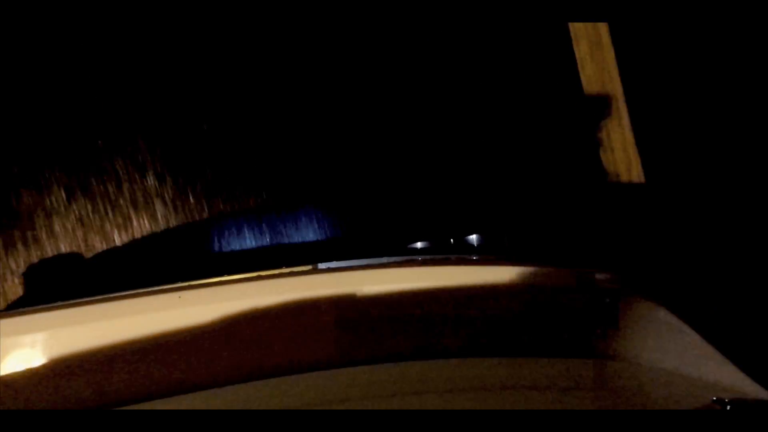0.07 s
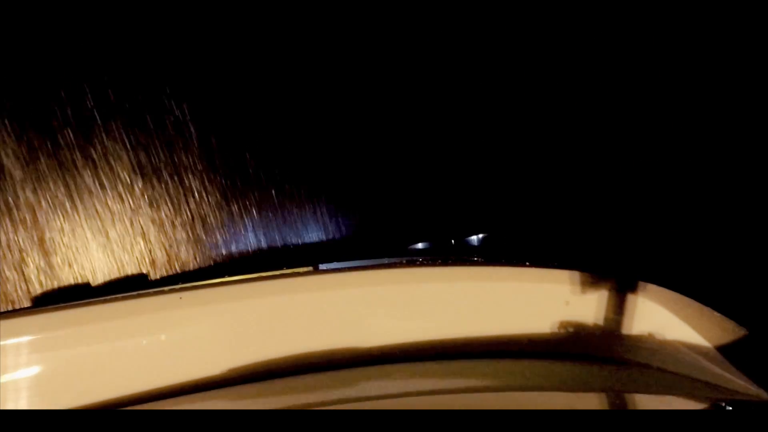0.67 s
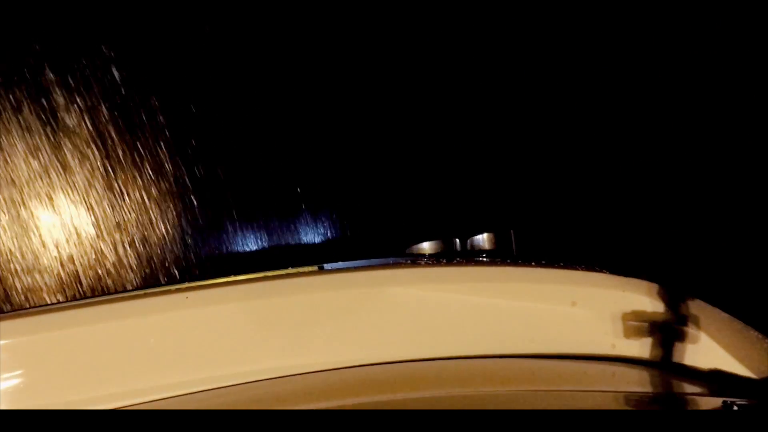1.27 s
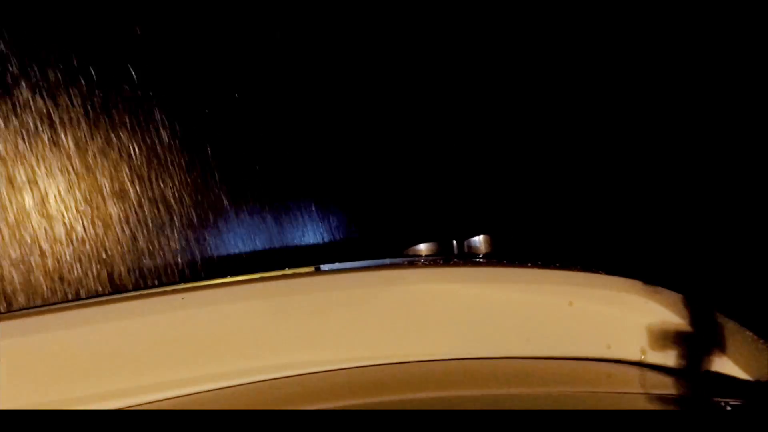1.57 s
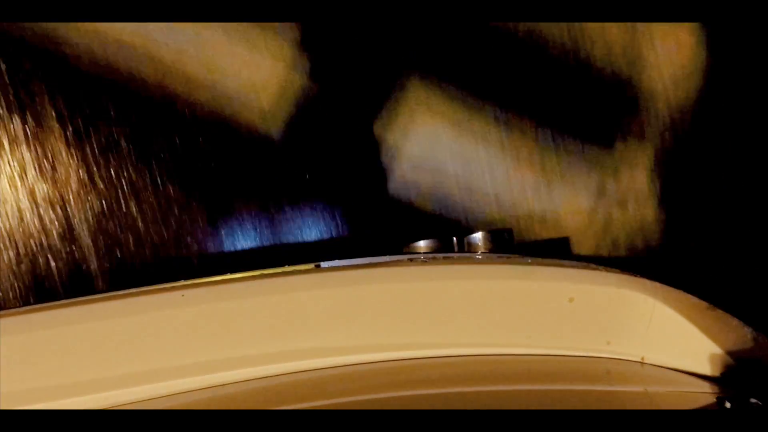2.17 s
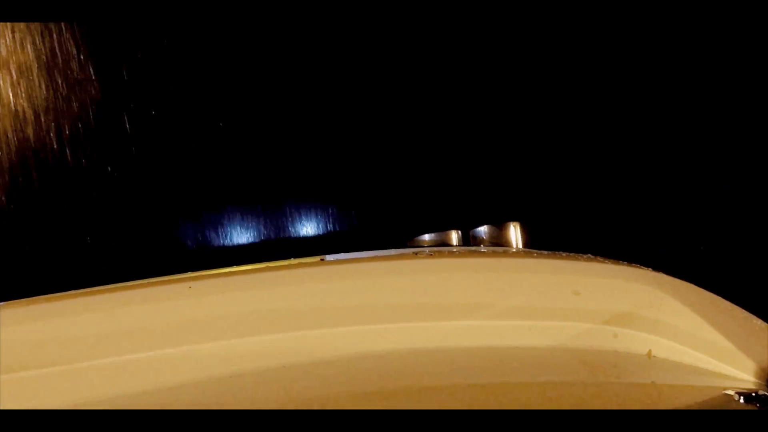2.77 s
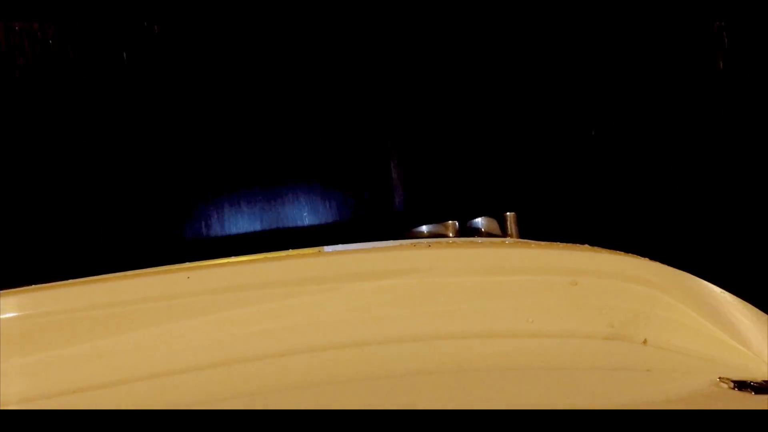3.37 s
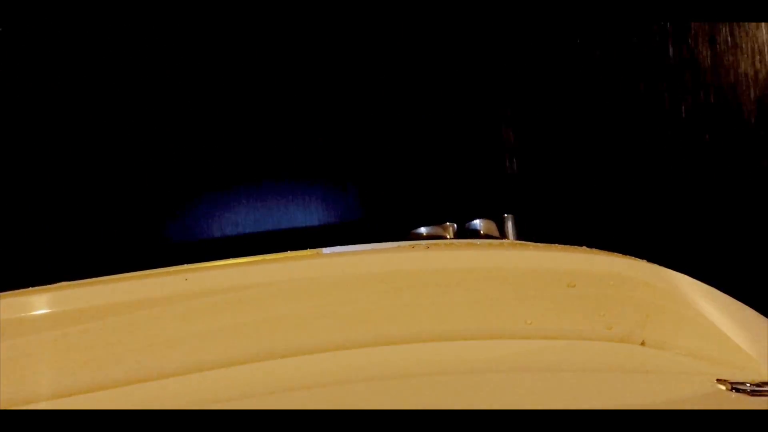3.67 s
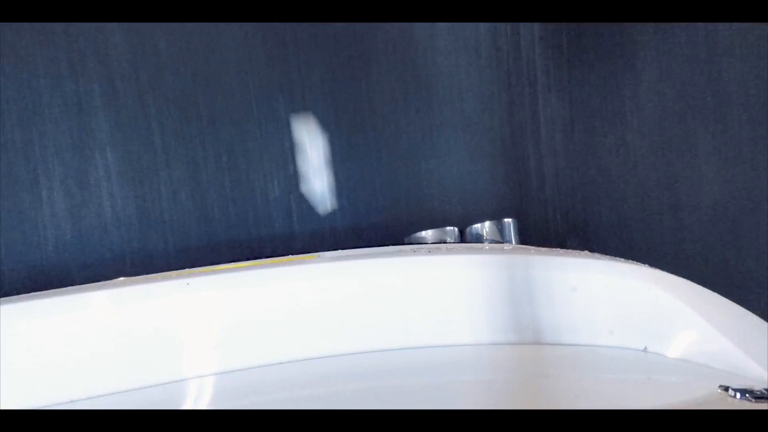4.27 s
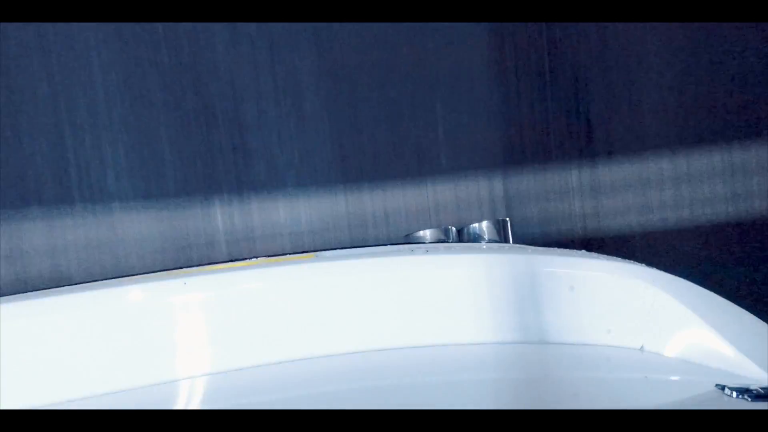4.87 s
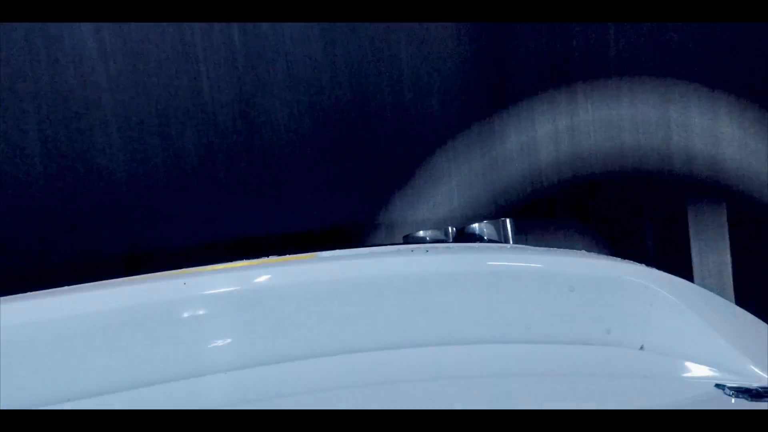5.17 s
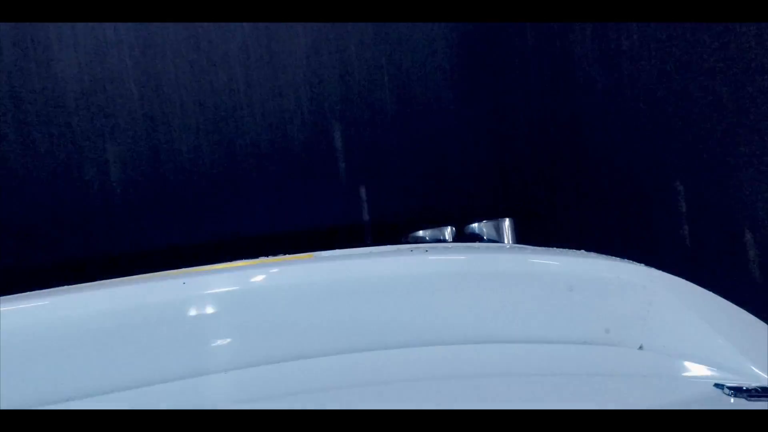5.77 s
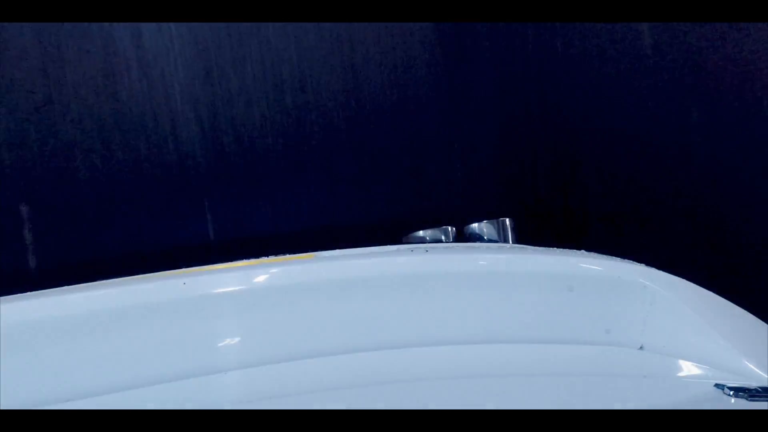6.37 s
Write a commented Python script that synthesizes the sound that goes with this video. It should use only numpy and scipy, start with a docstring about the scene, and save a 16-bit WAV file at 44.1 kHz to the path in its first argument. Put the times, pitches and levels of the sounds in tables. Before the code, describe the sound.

Irregular pops and crackle come from a moving car's open exhaust, with the microphone near the pipe. After about a second the engine growls and accelerates loudly, its pitch dipping once and climbing again. The throttle shuts, a loud crack follows, and the revs drop away into booming, sputtering backfires. Faint turbo whistles show near the end, over soft wind and road noise.

```python
"""Crackle and burble from the open exhaust of a four-cylinder car, heard beside the pipe as it drives.
The throttle opens and the engine pulls hard up the revs, each firing a pressure front that rings
the pipe. Then it lifts again: unburnt fuel goes off in the pipe in irregular pops as the revs sink.
The turbo whistles faintly over a low rush of wind and tyres."""
import sys
import numpy as np
from scipy import signal
from scipy.fft import rfft, irfft
from scipy.io import wavfile
from scipy.ndimage import uniform_filter1d

SR = 44100
rng = np.random.default_rng(int(sys.argv[2]) if len(sys.argv) > 2 else 0)


def to_wav(sig):
    """Store sig (one row per channel, or 1-D mono) as 16-bit WAV at the path in sys.argv[1].

    Samples outside -1..1 are clipped; the rate is SR.
    """
    pcm = np.clip(np.atleast_2d(sig), -1, 1) * 32767
    pcm = np.round(pcm).astype(np.int16)
    wavfile.write(sys.argv[1], SR, pcm.T)  # frames by channels


N = 291501
TIME = np.arange(N) / SR


def gain_of(db):
    return 10 ** (np.asarray(db) / 20)


def spectrum_at(points, hz):
    """Spectrum table, interpolated over log frequency."""
    points_hz, values = np.transpose(points)
    return np.interp(np.log(hz + 1), np.log(points_hz + 1), values)


def curves(rows):
    """Each column of a time table, per sample."""
    s, *columns = np.transpose(rows)
    return [np.interp(TIME, s, column) for column in columns]


def ramp(centre_s, length_s):
    """Linear rise from 0 to 1."""
    return np.clip((TIME - centre_s) / length_s + .5, 0, 1)


def swells(rows):
    """Sum of bell-shaped gains."""
    return sum(gain_of(db) * np.exp(-((TIME - s) / half_s) ** 2) for s, half_s, db in rows)


def noise(size=N):
    return rng.standard_normal(size)


def smooth(x, size):
    return uniform_filter1d(uniform_filter1d(x, size), size)


def wander(size=4000):
    """Slow random drift, unit deviation."""
    drift = smooth(noise(), size)
    return drift / drift.std()


def steady(x, size=4400):
    """Holds the running RMS at 1; fast throbs stay."""
    return x / np.sqrt(abs(smooth(x ** 2, size)) + 1e-12)


def through(x, response):
    return signal.oaconvolve(x, response)[:N]


def ring(x, colour, size=4096):
    """Minimum-phase filter from a spectrum table; impulse response scaled to peak 1."""
    hz = abs(np.fft.fftfreq(2 * size, 1 / SR))
    log_gain = np.log(gain_of(spectrum_at(colour, hz)))
    response = np.fft.ifft(np.exp(np.conj(signal.hilbert(log_gain)))).real[:size]
    return through(x, response / abs(response).max())


def clicks(times, strengths):
    """One impulse at each time."""
    at = np.clip(np.round(times * SR).astype(int), 0, N - 1)
    return np.bincount(at, strengths * (at < N - 1), N)


def puff(decay_s, size=3000):
    """Gas puff envelope: quick rise, exponential fall."""
    t = np.arange(size) / SR
    return np.exp(-t / decay_s) * (1 - np.exp(-t / 0.0013))


def eddies(pulses, decay_s):
    """A puff of turbulent noise behind each pulse."""
    return through(pulses, puff(decay_s)) * noise()


def echo(x, delay_s, share):
    """Adds one reflection."""
    return x + share * np.interp(TIME - delay_s, TIME, x, left=0)


def stereo_noise(colour):
    """Independent coloured noise in each channel, unit RMS."""
    return np.array([steady(ring(noise(), colour)) for _ in range(2)])


# Wind and tyre spectrum. Each row: frequency in Hz, relative level in dB.
ROAD_COLOUR = [(20, -22), (45, -35), (100, -34), (300, -4.5), (600, -14.5), (1400, -11.5), (2000, -27),
               (6000, -43.5), (8000, -42), (11000, -99.5)]

def road(level_db=-42):
    """Steady rush of wind and tyres."""
    return gain_of(level_db) * stereo_noise(ROAD_COLOUR)


# Rotor spooling up and running down. Each row: time in seconds, whistle pitch in Hz.
TURBO_PITCH = [(2.4, 5300), (2.65, 6100), (2.95, 6900), (3.7, 5500), (5.47, 3590), (5.8, 2830),
               (6.62, 2330)]
# Whistle swells. Each row: centre in seconds, half length in seconds, level in dB.
WHISTLES = [(5.5, 0.08, -45), (6.25, 0.047, -40), (6.44, 0.046, -34.5)]
# Boost escaping at the lift. Each row: centre in seconds, half length in seconds, level in dB.
BOOST_VENTS = [(3.25, 0.25, -55.5)]

def turbo(rows, width_hz):
    """Noise band that follows the rotor: a breathy whistle when narrow, a hiss when wide."""
    lowpass = signal.butter(2, width_hz, fs=SR, output="sos")
    flutter = signal.sosfilt(lowpass, noise() + 1j * noise())
    rotor = np.exp(2j * np.pi * np.cumsum(curves(TURBO_PITCH)[0]) / SR)
    return swells(rows) * steady((flutter * rotor).real)


OPEN_S, SHUT_S, RELIGHT_S = .895, 3.14, 3.26  # throttle opens, shuts; fuel catches in the pipe

def afterburn(catch_s=.035):
    """Share (0-1) of the burning that happens in the pipe instead of the cylinders."""
    return 1 - ramp(OPEN_S, catch_s) + ramp(RELIGHT_S, catch_s)


# Engine speed. Each row: time in seconds, firing rate in Hz.
FIRING_RATE = [(0.0, 84.9), (0.25, 75.2), (0.53, 60.5), (0.95, 51.0), (1.26, 56.9), (1.44, 88.9),
               (1.58, 95.4), (1.68, 90.2), (1.83, 84.8), (1.97, 92.8), (2.2, 97.0), (2.72, 110.4),
               (2.94, 117.1), (3.1, 114.4), (3.29, 116.8), (3.77, 108.7), (3.88, 91.0), (4.27, 71.7),
               (4.5, 69), (4.9, 61.7), (5.33, 55), (5.95, 55.3), (6.15, 56.8), (6.62, 54)]
# Load with the throttle open. Each row: time in seconds, effort in dB relative to full.
EFFORT = [(.9, -17), (1.0, -28.5), (1.21, -22.5), (1.33, -15.5), (1.39, -5.5), (1.47, 0), (1.65, -7.5),
          (1.81, -12.5), (1.96, -6), (2.2, -4.5), (2.48, -5.5), (2.65, -4), (2.98, -6), (3.1, -12),
          (3.25, -12)]

def pulling(db, per_effort, per_octave_db):
    """Layer gain under load: db at full effort and 100 firings a second, sloped by effort and revs."""
    octaves = np.log2(curves(FIRING_RATE)[0] / 100)
    return (1 - afterburn()) * gain_of(db + per_effort * curves(EFFORT)[0] + per_octave_db * octaves)


def gas_heat(lag_s=0.049, full_heat=0.4):
    """Exhaust gas heat trails the effort."""
    pole = np.exp(-1 / (lag_s * SR))
    burn = (1 - afterburn()) * gain_of(curves(EFFORT)[0])
    return full_heat * signal.lfilter([1 - pole], [1, -pole], burn)


# Off-throttle mix. Each row: time in seconds, then burble, crackle, rasp and hiss levels in dB.
COAST_LEVELS = [(0, -19, -45, -55, -52.5), (.45, -16, -40, -52, -53.5), (.88, -16.5, -40, -60, -61.5),
                (3.25, -15.5, -31, -46.5, -51.5), (3.65, -13.5, -32, -46.5, -52),
                (3.85, -14, -34.5, -47.5, -54.5), (4.2, -14.5, -35.5, -46.5, -56),
                (5.4, -15.5, -31.5, -40.5, -53), (6.6, -14.5, -31.5, -42.5, -54)]

def coasting():
    """Gains of burble, crackle, rasp and hiss off the throttle."""
    return afterburn() * gain_of(curves(COAST_LEVELS))


def firings(cycles, misfire, scatter_s=.0013, spread_db=7.0):
    """One exhaust pulse per cycle; misfire scatters its timing and strength."""
    at = np.flatnonzero(np.diff(np.floor(cycles)) > 0)
    jitter, luck, flame = rng.standard_normal((len(at), 3)).T
    erratic = misfire[at]
    times = at / SR + scatter_s * erratic ** 2 * jitter
    cylinder = np.arange(len(at)) % 4
    luck_db = spread_db * erratic * np.minimum(luck, 1.4)
    return times, cylinder, luck_db, flame, erratic


# Pipe hoots. Each row: centre in seconds, half length in seconds, pitch in Hz, level in dB.
HOOTS = [(4.237, .09, 376.4, -22), (4.243, 0.038, 481, -28), (4.518, .06, 427, -23.5),
         (4.764, .08, 378, -24), (4.958, 0.19, 481.5, -29.5), (5.14, 0.047, 331, -21.5),
         (5.613, .07, 340, -26), (5.96, 0.091, 333.2, -21.5), (6.122, 0.037, 331.7, -24.5)]

def hoots(waver_hz=4):
    """Short wavering tones, as when a sinking engine order meets a pipe resonance."""
    drift_hz = waver_hz * wander(size=1500)
    out = np.zeros(N)
    for s, half_s, hz, db in HOOTS:
        out += swells([(s, half_s, db)]) * np.sin(2 * np.pi * np.cumsum(hz + drift_hz) / SR)
    return np.sqrt(2) * out


# Drone after the lift. Each row: centre in seconds, half length in seconds, level in dB.
DRONE_SWELLS = [(3.47, 0.27, -20)]
# Pipe response to that burn. Each row: frequency in Hz, relative level in dB.
DRONE_COLOUR = [(30, -14), (58, -3), (85, 9), (115, 0), (143, 6), (200, -5), (300, -5), (380, -1), (440, 5),
                (515, 10), (575, 3), (640, -18), (700, -3), (820, -28), (3000, -69.5)]

def drone(times, cylinder, size=3000):
    """One cylinder's long late burn rings the pipe at a quarter of the firing rate."""
    burn = noise(size) * puff(.025, size)
    drive = through(clicks(times, cylinder == np.argmax(LATE_BURN_DB)), burn)
    return afterburn() * swells(DRONE_SWELLS) * steady(ring(drive, DRONE_COLOUR))


# Growls as the throttle opens and as the revs sink.
# Each row: centre in seconds, half length in seconds, level in dB.
GROWLS = [(1.15, 0.11, -29), (1.34, 0.11, -16.5), (4.0, 0.18, -41), (4.8, 0.25, -26), (5.85, 1, -23.5)]
# Middle pipe resonances. Each row: frequency in Hz, relative level in dB.
GROWL_COLOUR = [(130, -28), (190, -10.5), (230, 1), (280, 2.5), (335, 0), (400, -6), (490, -11.5),
                (560, -8), (640, -29), (1500, -40.5), (4000, -69.5)]

def growl(cycles):
    """Nearly regular firings throb in the pipe's middle resonances."""
    times, _, luck_db, _, _ = firings(cycles, misfire=np.full(N, .3))
    pulses = clicks(times, gain_of(luck_db))
    drive = .52 * steady(eddies(pulses, decay_s=.0023)) - steady(pulses)
    return swells(GROWLS) * steady(ring(drive, GROWL_COLOUR))


# Booms while coasting. Each row: centre in seconds, level in dB.
SURGES = [(4.569, -23), (4.817, -16.5), (4.996, -15.5), (5.196, -11), (5.392, -13), (5.574, -10.5),
          (5.772, -12), (5.933, -12), (6.194, -15.5), (6.382, -14), (6.566, -17.5)]

def surges(firing_hz, half_s=0.0548, sag=0.029):
    """The pipe booms near twice the firing rate; each boom sags in pitch as it passes."""
    out = np.zeros(N)
    for s, db in SURGES:
        age = np.clip((TIME - s) / half_s, -5, 5)
        cycles = np.cumsum(2 * firing_hz * (1 - sag * age)) / SR + rng.random()
        out += np.sqrt(2) * gain_of(db) * np.exp(-age ** 2) * np.sin(2 * np.pi * cycles)
    return out


# Low pipe resonances. Each row: frequency in Hz, level at full effort in dB.
HUM_COLOUR = [(52, -23.5), (62, -24), (72, -18), (78, -9.5), (88, -13), (101, -18.5), (115, -15.5),
              (130, -4), (150, -10.5), (165, -10.5), (174, -14), (188, -10.5), (208, -15.5), (228, -9.5),
              (255, -23), (295, -28.5), (345, -39.5), (460, -30.5)]
# Load response of orders 1 to 4. Each row: dB per dB of effort, off-throttle change in dB.
ORDER_LOAD = [(.17, -5), (.22, -10.5), (.23, -22.5), (.7, -17)]

def hum(cycles, firing_hz, suction_cycles=0.552, pedal_s=.08):
    """The lowest orders sweep the pipe's resonances and line up in the suction after each pulse."""
    throttle = ramp(OPEN_S, pedal_s) - ramp(SHUT_S, pedal_s)
    effort_db = curves(EFFORT)[0]
    out = np.zeros(N)
    for order, (per_effort, shut_db) in enumerate(ORDER_LOAD, 1):
        load_db = throttle * per_effort * effort_db + (1 - throttle) * shut_db
        gain = gain_of(spectrum_at(HUM_COLOUR, order * firing_hz) + load_db)
        out -= gain * np.cos(2 * np.pi * order * (cycles - suction_cycles))
    return np.sqrt(2) * out


# Thud of a burn in the pipe. Each row: frequency in Hz, relative level in dB.
THUMP_COLOUR = [(20, -22), (40, -9), (65, 2.5), (110, 2.5), (160, 4), (200, -4.5), (280, -6.5), (360, -5.5),
                (430, -7.5), (520, -5), (590, -16.5), (680, -20.5), (1400, -41), (2000, -49.5), (8000, -78)]
# Engine stumbles under load. Each row: centre in seconds, half length in seconds, level in dB.
STUMBLES = [(1.595, 0.021, -18.5)]

def burble(times, strengths, misfire):
    """Late burns thud in the pipe, bounce off its far end and leave the gas churning."""
    pulses = clicks(times, strengths)
    stumble = swells(STUMBLES)
    churn = (misfire + 5 * stumble) * steady(eddies(pulses, decay_s=0.043))
    thuds = ring(steady(pulses) + churn, THUMP_COLOUR)
    gain = coasting()[0] + stumble + pulling(db=-21.0, per_effort=0.42, per_octave_db=15.0)
    return gain * steady(echo(thuds, delay_s=0.00852, share=0.19), size=2400)


def buffet(relative_db=-15):
    """Churning gas off the throttle buffets each channel separately, following the burble level."""
    return gain_of(relative_db) * coasting()[0] * stereo_noise(THUMP_COLOUR)


def hot_ring(x, colour, stretch=0.2):
    """Sound is faster in hot gas: heat crossfades to higher pipe resonances."""
    heat, steps = gas_heat(), np.linspace(0, 1, 3)
    out = np.zeros(N)
    for step, weights in zip(steps, np.eye(3)):
        raised = [(hz * (1 + stretch * step), db) for hz, db in colour]
        out += np.interp(heat, steps, weights) * ring(x, raised)
    return out


def plume(x):
    """An echo through the turbulent plume drifts in delay, so overtones swell and break up."""
    return echo(x, delay_s=.00216 + .00004 * wander(), share=.38)


def gas_noise(pulses, decay_s, flow):
    """Turbulence from pulsed puffs on top of a constant flow, unit RMS."""
    envelope = steady(through(pulses, puff(decay_s))) + flow
    return steady(envelope * noise())


# Four spectra of the jet at the pipe's lip. Each row: frequency in Hz, relative level in dB.
CRACK_COLOUR = [(200, -50), (500, 4.5), (700, 9), (950, 9), (1200, 11), (1350, 6), (1480, 7.5),
                (1650, -4.5), (1900, -26), (2380, -12.5), (3200, -43), (4000, -26.5), (7000, -90),
                (10000, -65)]
BRASS_COLOUR = [(1500, -32.5), (1900, -18.5), (2150, -1.5), (2330, 6.5), (2450, 4), (2560, -7), (2750, 3.5),
                (2860, -5.5), (2960, -9), (3200, 0.5), (3520, -13.5), (3760, -6), (4000, -13.5),
                (4500, -7.5), (5300, -39)]
RASP_COLOUR = [(1200, -55), (1750, 11.5), (1920, 0.5), (2150, 4), (2280, 0), (2430, 8), (2620, 2),
               (2850, 1), (3250, -6), (3600, -4.5), (3950, 0), (4300, -17), (5200, -48.5)]
HISS_COLOUR = [(3600, -14.5), (4500, -8), (5250, -10), (5800, -3), (6300, -8), (6900, -10), (7300, -16),
               (7900, -22.5), (8400, -38), (10000, -34.5), (11000, -64.5)]
# Extra gas as the throttle bites and at full boost.
# Each row: centre in seconds, half length in seconds, level in dB.
SPILLS = [(1.42, 0.018, -48.5), (2.66, 0.035, -45.5), (2.89, 0.13, -43)]

def jet(times, strengths, misfire):
    """Each pulse cracks at the lip, rings brassily under load and drags rasp and hiss behind it."""
    pulses = clicks(times, strengths)
    fronts = -steady(pulses)
    bunching = gain_of(3 * wander(size=2000) - 1)
    # erratic or feeble firing tears the fronts into noise
    feeble = (1 - afterburn()) * np.clip(-curves(EFFORT)[0] / 20, 0, 1) ** 3
    crackle_tear = (1.6 * misfire ** 1.4 + 2 * feeble) * gas_noise(pulses, decay_s=.005, flow=.2)
    brass_tear = (1.6 * misfire ** 1.5 + 2 * feeble) * gas_noise(pulses, decay_s=.003, flow=.3)
    crackle = plume(hot_ring(fronts + crackle_tear, CRACK_COLOUR))
    brass = plume(ring(fronts + brass_tear, BRASS_COLOUR))
    rasp = hot_ring(gas_noise(pulses, decay_s=0.004, flow=0.94), RASP_COLOUR)
    hiss = ring(gas_noise(np.sqrt(pulses), decay_s=0.0047, flow=1.0), HISS_COLOUR)

    _, crackle_coast, rasp_coast, hiss_coast = coasting()
    spill = swells(SPILLS)
    crackle_gain = bunching * crackle_coast + pulling(db=-21.0, per_effort=1.21, per_octave_db=-7.0)
    brass_gain = spill + pulling(db=-36.5, per_effort=1.38, per_octave_db=-4.5)
    rasp_gain = bunching * rasp_coast + pulling(db=-41, per_effort=0.8, per_octave_db=-9)
    hiss_gain = hiss_coast + spill + pulling(db=-42.5, per_effort=0.73, per_octave_db=1.0)
    return (crackle_gain * steady(crackle) + brass_gain * steady(brass)
            + rasp_gain * steady(rasp) + hiss_gain * steady(hiss))


# Pipe response under throttle. Each row: frequency in Hz, relative level in dB.
BARK_COLOUR = [(200, -11.5), (290, 11), (370, 10.5), (560, 10.5), (680, 6), (800, 1), (950, 3), (1200, -2),
               (1450, -14.5), (1700, -5), (1900, -57), (2450, -20.5), (3500, -40), (8000, -67)]

def bark(times, strengths, round_trip_s=0.00465, hot_speedup=0.9):
    """Under load each firing leaves as a steep front; its echo wavers and returns sooner in hot gas."""
    pulses = clicks(times, strengths)
    drive = .45 * steady(eddies(pulses, decay_s=.0035)) - steady(pulses)
    delay_s = round_trip_s / (1 + hot_speedup * gas_heat()) + .0002 * wander()
    pipe = echo(ring(drive, BARK_COLOUR), delay_s, share=.25)
    return pulling(db=-16.0, per_effort=1.0, per_octave_db=-3.0) * steady(pipe)


# Backfires. Each row: start in seconds, then crack, thump and sizzle levels in dB before trim.
BACKFIRES = [(0.191, -13.5, -21, -30), (0.282, -7.5, -15.5, -41), (0.357, -20, -23.5, -29.5),
             (0.422, -10, -15.5, -30), (0.451, -10, -12, -47), (0.533, -20, -21, -30),
             (0.559, -23.5, -14.5, -44), (0.596, -10, -17, -32.5), (0.659, -12, -19.5, -23.5),
             (0.711, -17, -14, -56.5), (0.786, -15, -26.5, -26.5), (0.803, -18.5, -21.5, -24),
             (0.821, -24, -14, -46), (0.84, -17, -17.5, -44), (0.859, -12.5, -30, -28.5),
             (0.879, -11.5, -23, -27), (0.898, -24, -22.5, -40), (1.994, -12.5, -31.5, -28),
             (2.621, -6, -27.5, -18), (3.798, -17, -16.5, -36), (3.83, 0.5, -11.5, -26),
             (3.851, -14, -22.5, -32), (4.218, -13, -16.5, -41), (4.245, -18.5, -13.5, -48),
             (4.286, -13, -17, -38), (4.358, -14.5, -19.5, -39), (4.389, -15, -11, -58),
             (4.432, -10.5, -22, -24), (4.615, -10, -20, -25), (4.719, -8.5, -14, -34),
             (4.754, -10, -15.5, -36), (4.961, -14, -11.5, -38), (5.013, -14.5, -16, -33),
             (5.043, -8, -13, -56), (5.075, -9, -12.5, -35), (5.094, -13, -14, -42),
             (5.13, -16.5, -19.5, -22), (5.197, -17.5, -25.5, -24.5), (5.313, -15, -14.5, -36),
             (5.35, -12.5, -23, -30), (5.401, -13, -18.5, -22), (5.472, -10, -21, -20.5),
             (5.483, -14, -19, -31), (5.504, -13.5, -21, -30), (5.557, -17, -23.5, -30),
             (5.591, -12, -21, -23), (5.679, -19.5, -20, -25.5), (5.728, -19, -13.5, -31),
             (5.751, -14, -25, -35.5), (5.768, -10, -30, -25.5), (5.824, -13.5, -22.5, -21.5),
             (5.837, -6.5, -15, -38), (5.872, -14.5, -24, -46.5), (5.894, -9.5, -19, -33),
             (5.912, -12, -21.5, -31.5), (5.948, -14.5, -24.5, -26), (5.986, -15, -25.5, -34.5),
             (6.055, -11, -11.5, -40), (6.074, -14, -17, -45), (6.112, -14.5, -22, -22),
             (6.147, -13, -17, -43), (6.188, -16.5, -21.5, -24.5), (6.207, -14, -18.5, -28),
             (6.225, -12.5, -26, -27), (6.318, -20, -17.5, -29), (6.337, -8.5, -18, -23),
             (6.503, -12, -15, -31.5), (6.542, -6, -15, -49), (6.564, -9, -19.5, -41)]
# Spectra of the snap and of the flame ringing the pipe's tip. Each row: frequency in Hz, relative level in dB.
SNAP_COLOUR = [(600, -16.5), (1800, 18.5), (2400, 11.5), (3300, -3.5), (4000, 6), (4600, -9.5),
               (7000, -36.5), (10000, -36.5)]
SIZZLE_COLOUR = [(1200, -30.5), (1750, 2.5), (2200, 6), (2500, 3.5), (3000, -4), (3500, -3), (3800, 0.5),
                 (4050, 0), (4400, -11), (6000, -12), (7200, -13), (8400, -43.5)]

def backfires(thump_trim_db=11, crack_trim_db=-5.0, sizzle_trim_db=-8.0, snap_trim_db=-15, tear=0.17):
    """A charge goes off in the pipe: a thump, a torn crack and the sizzle of the flame."""
    start_s, crack_db, thump_db, sizzle_db = np.transpose(BACKFIRES)
    thumps = ring(clicks(start_s, gain_of(thump_db + thump_trim_db)), THUMP_COLOUR)
    fronts = clicks(start_s + 0.00067, gain_of(crack_db + crack_trim_db))
    cracks = ring(tear * eddies(fronts, decay_s=0.0014) - fronts, CRACK_COLOUR)
    # the strongest fronts add a bright snap
    snaps = -gain_of(snap_trim_db) * ring(fronts ** 1.5, SNAP_COLOUR)
    flares = through(clicks(start_s, gain_of(sizzle_db + sizzle_trim_db)), puff(0.0088))
    sizzle = flares * steady(ring(noise(), SIZZLE_COLOUR))
    return thumps + cracks + snaps + sizzle


# Single engine overtones briefly swell or fade as the revs climb.
# Each row: centre in seconds, half length in seconds, engine order, change in dB.
ORDER_SWELLS = [(1.345, .04, 1, -10), (1.05, .16, 2, 3), (1.0, .12, 3, -4), (.96, .08, 4, -4),
                (1.19, .06, 4, 3), (1.39, .05, 3, -5), (1.67, .05, 3, -5), (1.9, .05, 3, -7),
                (1.54, .08, 4, -8), (2.3, .08, 4, 4), (2.48, .1, 4, -7), (1.41, .05, 5, 4),
                (2.03, .1, 5, -4), (2.82, .07, 5, -9), (1.7, .08, 6, 5), (2.18, .18, 6, 6),
                (2.25, .1, 7, 7), (2.62, .08, 7, 8)]

def swell_orders(x, cycles, size=1800):
    """Isolates single engine orders and briefly swells or fades each."""
    out = x.copy()
    for s, half_s, order, db in ORDER_SWELLS:
        carrier = np.exp(2j * np.pi * order * cycles)
        partial = 2 * (carrier * smooth(x / carrier, size)).real
        bell = np.exp(-((TIME - s) / half_s) ** 2)
        out += (gain_of(db * bell) - 1) * partial
    return out


# Bodywork shading. Each row: frequency in Hz, left minus right in dB.
STEREO_BALANCE = [(60, 4), (170, 2.6), (280, 3), (400, 5.2), (540, 6.5), (660, 0), (770, -3), (930, 1.5),
                  (1130, 0), (1620, 4), (2100, -1), (2400, 2), (3100, 0), (7000, 3.5)]
# Bodywork delay. Each row: frequency in Hz, left phase lead in radians.
STEREO_PHASE = [(60, 0), (330, 0), (450, -.55), (560, -.95), (700, -1.3), (850, .5), (1000, 0), (1700, -.5),
                (2150, .4), (2600, -.4), (4300, 0), (5100, -.6), (6000, -.1)]

def bodywork(x, size=1500):
    """Panels shade and delay the two channels differently and scatter the treble."""
    hz, spectrum = np.fft.rfftfreq(N, 1 / SR), rfft(x)
    left = gain_of(spectrum_at(STEREO_BALANCE, hz) / 2) * np.exp(.5j * spectrum_at(STEREO_PHASE, hz))
    right = 1 / left
    direct = spectrum * np.array([left, right]) / abs((left + right) / 2)
    panels = noise(size) * puff(.006, size)
    scatter = .02 + .22 * hz / (hz + 600) + .42 * hz / (hz + 6000)
    diffuse = spectrum * rfft(panels / np.linalg.norm(panels), N) * scatter
    return irfft(direct + np.array([diffuse, -diffuse]), N)


# Normal and late burns. Each entry: a cylinder's strength in dB before compression, in firing order.
NORMAL_BURN_DB = [0.75, 10.2, 8, 9]
LATE_BURN_DB = [-2, 10, -13, -13]
# Erratic firing under load. Each row: time in seconds, misfire amount 0-1.
PULL_MISFIRE = [(1.3, .3), (1.6, .32), (1.85, .38), (2.08, .19), (2.28, .19), (2.42, .34), (2.62, .24),
                (2.85, .38)]
# Erratic firing off the throttle. Each row: firing rate in Hz, misfire amount 0-1.
COAST_MISFIRE = [(65, 1), (105, .8), (116, .45)]

def engine():
    """One crankshaft times the exhaust layers; hoots and turbo join them."""
    firing_hz, in_pipe = curves(FIRING_RATE)[0], afterburn()
    coast_misfire = np.interp(firing_hz, *np.transpose(COAST_MISFIRE))
    misfire = (1 - in_pipe) * curves(PULL_MISFIRE)[0] + in_pipe * coast_misfire
    cycles = np.cumsum(firing_hz) / SR
    times, cylinder, luck_db, flame, erratic = firings(cycles, misfire)
    # a backfire uses up the fuel of a firing that coincides with it
    backfire_gap_s = abs(times[:, None] - np.transpose(BACKFIRES)[0]).min(1)
    unspent = np.clip(backfire_gap_s / 0.0012, .15, 1)
    normal_burns = gain_of(np.take(NORMAL_BURN_DB, cylinder) + luck_db + (.8 + 1.9 * erratic) * flame)
    # off the throttle at high revs, one cylinder dominates
    imbalance = np.interp(times, TIME, .1 + in_pipe * np.interp(firing_hz, [90, 110], [.1, .22]))
    late_burns = gain_of(np.take(LATE_BURN_DB, cylinder) * imbalance + luck_db) * unspent
    # fronts vary little in a clean pull, more when firing is erratic
    fronts = normal_burns ** (.35 + .25 * erratic) * gain_of(2 * np.sqrt(erratic) * flame) * unspent
    low = hum(cycles, firing_hz) + surges(firing_hz) + burble(times, late_burns, misfire)
    middle = drone(times, cylinder) + growl(cycles) + hoots()
    high = bark(times, normal_burns ** 0.25) + jet(times, fronts, misfire)
    boost = turbo(WHISTLES, width_hz=100) + turbo(BOOST_VENTS, width_hz=280)
    return swell_orders(low + middle + high + boost, cycles)


def scene():
    """Engine and backfires off the bodywork, over gas buffeting and road noise."""
    return bodywork(engine() + backfires()) + buffet() + road()


def record(dry, knee=.62, headroom=.34, cutoff_hz=9800):
    """Soft-clips peaks above the knee, then low-passes."""
    over = np.maximum(abs(dry) - knee, 0)
    rounded = dry - np.sign(dry) * (over - headroom * np.tanh(over / headroom))
    lowpass = signal.firwin(255, cutoff_hz, window=("kaiser", 9), fs=SR)
    return signal.oaconvolve(rounded, lowpass[None], "same")


dry = scene()
out = record(dry)
to_wav(out)
```